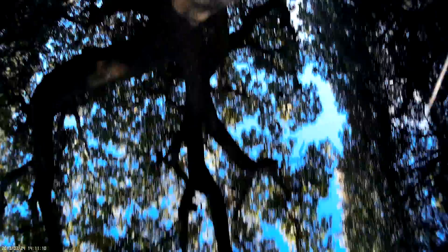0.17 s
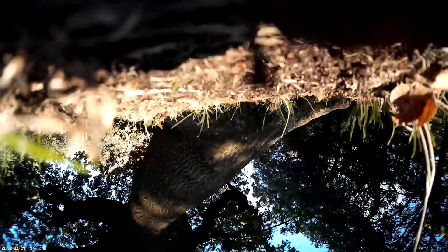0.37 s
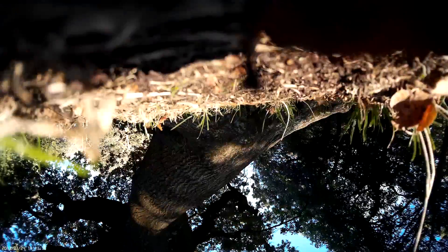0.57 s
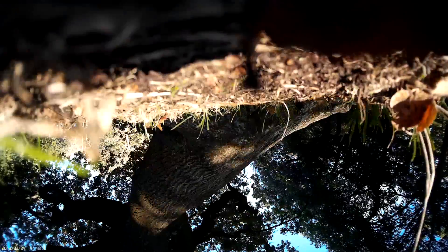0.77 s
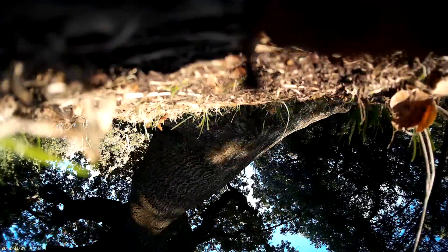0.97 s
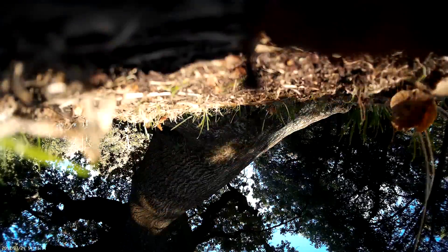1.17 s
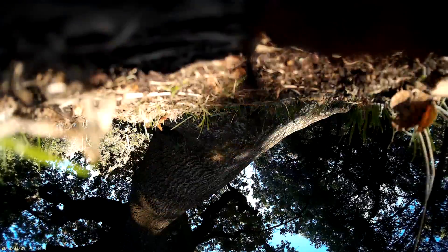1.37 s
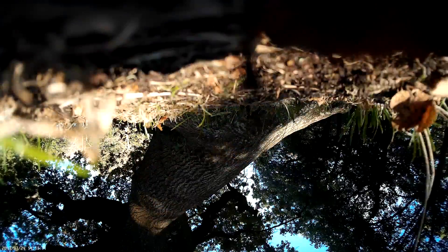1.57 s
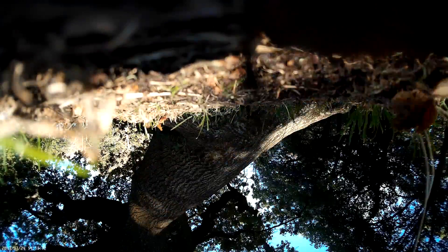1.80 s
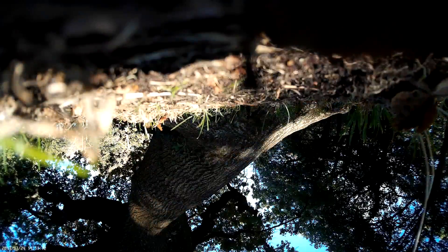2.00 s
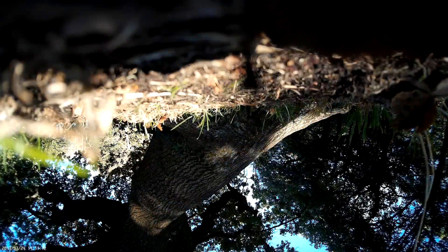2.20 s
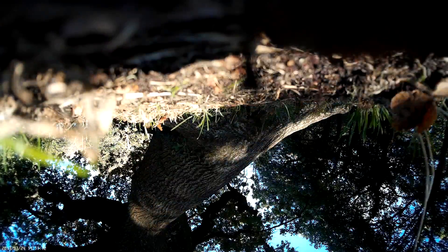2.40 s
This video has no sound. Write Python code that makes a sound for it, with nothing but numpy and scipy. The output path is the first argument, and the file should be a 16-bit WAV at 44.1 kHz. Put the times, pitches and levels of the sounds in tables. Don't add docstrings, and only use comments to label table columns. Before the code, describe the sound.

A small drone crashes into dry leaf litter with a hard clattering rattle, then quiet outdoors

```python
import sys
import numpy as np
from scipy import signal
from scipy.fft import rfft, irfft, next_fast_len
from scipy.io import wavfile
from scipy.ndimage import uniform_filter1d, map_coordinates

SR = 44100
rng = np.random.default_rng(int(sys.argv[2]) if len(sys.argv) > 2 else 0)


def file_out(sig):
    cols = np.atleast_2d(sig).T
    lim = np.clip(cols, -1, 1)
    pcm = np.round(lim * 32767).astype(np.int16)
    wavfile.write(sys.argv[1], SR, pcm)


def makeup_ratio(level_db):
    decades = np.asarray(level_db, float) / 20
    return 10 ** decades


N = 108045

# (frequency [Hz], level [dB])
AIR_SPECTRUM = [(120, -23.5), (200, -4), (293, -3.5), (577, -7), (643, -7.5), (1260, -6), (2390, -9.5),
                (4970, -25), (15700, -40.5)]
# (frequency [Hz], level [dB])
RUMBLE_SPECTRUM = [(12, -29.5), (20, 8), (118, 1.5), (214, -5), (247, -15.5), (300, -13), (390, -36.5),
                   (660, -120)]
# (time [s],
# peak level [dB], ring frequency [Hz])
SHARP_TICKS = [(.001, -30.5, 6000), (.022, -36, 5930), (0.0398, -27, 10200), (.042, -29, 9030),
               (0.0725, -19, 5920), (0.0813, -19, 9700), (0.086, -31, 10000), (0.1081, -22, 9400),
               (.125, -35, 9000), (0.1385, -29, 4470), (0.15, -27, 8000), (0.1556, -19, 7500),
               (.161, -25, 6940), (.166, -17.5, 5700), (.1695, -20, 5500), (0.1733, -21, 6000),
               (0.1797, -19, 7600), (0.1798, -23.5, 2020), (0.192, -24.5, 1670), (0.1934, -17.5, 3780),
               (.1934, -22, 11000), (0.211, -31.5, 7040), (.432, -32, 7000), (0.464, -45, 8500),
               (.472, -41, 3500), (.4767, -25.5, 2800), (0.4825, -27.5, 2040), (.4845, -32, 2520),
               (0.4887, -27, 2900), (0.522, -48, 9000), (.552, -51, 7460), (0.0729, -24.5, 11000),
               (.1914, -21.5, 1900), (0.1543, -25.5, 5000), (.2045, -31, 9000), (.3885, -37, 7500),
               (0.303, -17, 5230), (0.3194, -12, 14420), (.3764, -21, 13900), (0.4023, -24, 6500),
               (.4058, -27, 4860), (.3642, -32, 10500), (0.3102, -27, 7200)]
# (time [s], level [dB])
SLIDE_LEVEL = [(0, -59.5), (.14, -45.5), (.16, -44), (.208, -43.5), (.22, -32), (.262, -28.5),
               (.288, -37.5), (.33, -25.5), (.365, -36), (.39, -40), (.435, -51), (.6, -66)]
# (frequency [Hz], level [dB])
LITTER_SPECTRUM = [(120, -36.5), (200, 1.5), (547, 2), (1760, 3), (1900, 6.5), (2400, -13), (2890, -3.5),
                   (5370, -3.5), (11000, -13), (15900, -21.5)]
# (frequency [Hz], level [dB])
CRACK_SPECTRUM = [(400, -26.5), (900, -6), (1700, -3), (3200, 3), (7300, -1), (12000, -9), (15000, -23.5),
                  (16600, -27.5)]
# (time [s], blade rate [Hz], hiss level [dB], blade tone level [dB], overtone level [dB])
FRONT_PASS = [(0, 475, -59.5, -76.5, -78.5), (.9, 468.7, -58.5, -75, -73.5),
              (1.25, 478.5, -53, -59.5, -62.5), (1.45, 485.4, -51.5, -57, -59),
              (1.62, 497.3, -50, -57.5, -61), (1.68, 505.2, -45.5, -56, -55.5),
              (1.76, 507.8, -46.5, -51, -53), (1.82, 502.4, -44.5, -50, -54),
              (1.88, 500.9, -45.5, -65, -45.5), (1.94, 510, -43, -55.5, -45.5),
              (2.0, 485.2, -45, -53.5, -51.5), (2.07, 466.4, -45, -51.5, -51.5),
              (2.125, 446.2, -45.5, -49, -48), (2.17, 444, -49, -61.5, -60), (2.22, 441.6, -55, -62, -69),
              (2.32, 442, -53.5, -58, -61), (2.45, 450, -52, -55, -65.5)]
# (time [s], blade rate [Hz], level [dB])
REAR_PASS = [(.9, 395, -71.5), (1.4, 406.2, -62.5), (1.65, 413.5, -57.5), (1.77, 419.5, -54),
             (1.86, 418.3, -45.5), (1.9, 415.5, -53), (1.96, 406.8, -52), (2.07, 368.1, -55),
             (2.22, 349.7, -56.5), (2.33, 368.6, -56.5), (2.45, 373, -57)]
# (time [s], blade rate [Hz], level [dB])
TURNING_AWAY = [
    (1.95, 430, -83),
    (2.12, 432.2, -64),
    (2.3, 423.4, -57),
    (2.45, 404.4, -53.5),
]
# (multiple of blade rate [1], level [dB])
BLADE_PARTIALS = [(.5, -11), (1, 0)]
# (multiple of blade rate [1], level [dB])
FRONT_OVERTONES = [(2, -3), (3, 0), (4, -7.5), (5, -13.5), (7, -12), (8, -14)]
# (multiple of blade rate [1], level [dB])
REAR_PARTIALS = [(.5, -8), (1, -1.5), (2, -8), (3, -5), (4, -14), (5, -12)]
# (multiple of blade rate [1], level [dB])
TURNING_PARTIALS = [(.5, -2.5), (1, -2), (1.5, -7.5), (3, -14.5)]
# (frequency [Hz], level [dB])
ROTOR_SPECTRUM = [(170, -46), (280, -8), (1600, -3.5), (2300, -9), (4000, -13), (7600, -18.5), (8600, -25),
                  (15700, -33)]
# (time [s], peak level [dB], frequency [Hz])
SOIL_THUDS = [(0.039, -42, 149), (0.221, -25, 64.4), (.249, -17, 791), (0.246, -19.5, 201),
              (0.2535, -14, 342), (.2535, -6, 695), (0.256, -13.5, 130), (0.2587, -12.5, 259.6),
              (.259, -17, 420), (.274, -17.5, 536), (0.306, -24, 344), (0.318, -16, 131),
              (.321, -17.5, 670), (0.331, -20, 790), (0.338, -27, 70), (0.354, -27, 70),
              (0.353, -23.5, 560)]
# (frequency [Hz], level [dB])
LEAK_TONES = [(14826, -78), (15499, -82)]
# (time [s], length [s], level [dB])
LEAK_BURSTS = [
    (.066, .175, 0),
    (1.074, 0.16, 2),
    (2.065, .09, 4),
]
# (time of peak [s], peak level [dB], ring frequency [Hz], contact time [s])
FRAME_BLOWS = [(.2172, -27, 1990, .0007), (.223, -24.5, 5600, 0.0027), (.232, -25, 1900, 0.0006),
               (.2372, -20, 4910, 0.0013), (.2452, -22, 10060, 0.00033), (.2468, -13.5, 1954, .001),
               (.2488, -10, 1925, 0.0014), (.2508, -3.5, 7180, .0006), (.2510, -5, 4855, .0007),
               (.2509, -11.5, 9530, .0005), (.2508, -11.5, 13800, 0.00058), (.2536, -17, 11980, 0.00067),
               (.2538, -11.5, 14170, 0.00042), (.2552, -0.5, 1612, .0011), (.2566, -2.5, 6160, .0007),
               (.2566, -7, 9940, 0.00087), (.2568, -10, 11570, .0006), (.2592, -8, 1650, 0.0011),
               (.2729, -5, 7380, .0005), (.2729, -15, 13700, 0.00038), (.2767, -15, 7400, 0.00069),
               (.2766, -20.5, 12500, .0005), (.2942, -27, 1210, .001), (.2965, -32, 2700, 0.0011),
               (.3023, -15, 1700, 0.0005), (.3127, -20, 10900, .0007), (.3136, -15, 7480, 0.00098),
               (.3158, -18, 3830, 0.0007), (.319, -14, 8860, .0004), (.3196, 0.5, 3200, 0.0008),
               (.3275, -20.5, 1800, .0015), (.3352, -21, 1000, 0.00094), (.336, -20, 3600, .001),
               (.3383, -12.5, 7350, 0.00045), (.3384, -15, 12000, 0.00044), (.3482, -29.5, 12500, 0.0005),
               (.351, -23.5, 5000, 0.00081), (.355, -16, 3200, .0006), (.3567, -23, 7400, 0.00062),
               (.3598, -18, 4000, 0.00071), (.369, -27.5, 1710, .0012), (.3738, -16, 2880, 0.0008),
               (.3762, -19.5, 2850, .001), (.3763, -21.5, 5900, .0007), (.3785, -20.5, 1710, .0015),
               (.4021, -26, 4930, 0.00084), (.4148, -21.5, 4900, 0.001), (.4174, -29, 4800, .0006),
               (.4194, -16, 4610, 0.001), (.4214, -23, 4720, 0.00077)]
# (frequency [Hz], level [dB], T60 [s])
FRAME_MODES = [(1650, -8.5, 0.019), (1954, -12, .025), (3200, -20, .015), (4900, -9, 0.022),
               (7400, -12.5, 0.023), (12000, -16.5, .015)]
# (frequency [Hz], width [Hz], level [dB])
CASE_RESONANCES = [(2594, 500, -8.5), (3910, 280, 4), (4970, 160, 5), (6740, 580, 0.5)]


def unit(x):
    return x / np.sqrt(np.mean(x ** 2) + 1e-20)


def curves(rows):
    times, *columns = np.transpose(rows)
    return [np.interp(np.arange(N) / SR, times, column) for column in columns]


def wobble(rate):
    knots = rng.standard_normal(int(N * rate / SR) + 4)
    return map_coordinates(knots, [np.arange(N) * rate / SR])


def coloured(x, points):
    size = next_fast_len(N + 8192)
    hz, db = np.transpose(points)
    bins = np.fft.rfftfreq(size, 1 / SR)
    gain = makeup_ratio(np.interp(np.log(bins + 1), np.log(hz + 1), db))
    return irfft(rfft(x, size) * gain, size)[:N]


def rush(points, patchy_db):
    z = signal.stft(rng.standard_normal(N + 512), nperseg=512)[2]
    field = uniform_filter1d(rng.standard_normal(z.shape), 5, 0)
    field = unit(uniform_filter1d(field, 10, 1))
    patchy = signal.istft(z * makeup_ratio(patchy_db * field), nperseg=512)[1][:N]
    return unit(coloured(patchy, points))


def outdoors():
    air_db = -51.5 + 0.79 * wobble(8)
    air = makeup_ratio(air_db) * rush(AIR_SPECTRUM, patchy_db=0.5)
    gust_s, gust_length_s, gust_db = 1.81, 0.094, 4.5
    t = np.arange(N) / SR
    gust = gust_db * np.exp(-((t - gust_s) / gust_length_s) ** 2)
    rumble_db = -52.5 + gust + 1.4 * wobble(10)
    return air + makeup_ratio(rumble_db) * rush(RUMBLE_SPECTRUM, patchy_db=1.5)


def swell(u):
    return (u * np.exp(1 - u)) ** 1.11


def contacts(rows, ring_db, crack_db, crack_share):
    spread, snap_size, snap_s = 0.12, 0.3, 0.00016
    mode_rank = np.arange(4)[:, None]
    mode_gain = np.array([[1], [.25], [.15], [.12]])
    out = np.zeros(N + SR)
    t = np.arange(SR // 20) / SR
    grit = unit(coloured(rng.standard_normal(N), CRACK_SPECTRUM))
    snap = snap_size * swell(t / snap_s)
    for s, db, hz, length in rows:
        start = max(round((s - length) * SR), 0)
        detune, phase = rng.uniform(-0.88, 1, (2, 4, 1))
        mode_hz = hz * (1 + spread * detune * mode_rank)
        ring = (np.sin(2 * np.pi * mode_hz * t + np.pi * phase) * mode_gain).sum(0)
        crack_swell = swell(t / (crack_share * length)) + snap
        crack = makeup_ratio(crack_db) * crack_swell * grit[start:start + len(t)]
        hit = makeup_ratio(ring_db) * swell(t / length) * ring + crack
        out[start:start + len(t)] += makeup_ratio(db) * hit
    return out[:N]


def sharp_ticks():
    t60_s = .0014
    rows = []
    for s, db, hz in SHARP_TICKS:
        rows.append((s, db, hz, t60_s / np.log(1000) * (6000 / hz) ** 1.3))
    return contacts(rows, ring_db=-6.5, crack_db=-13.0, crack_share=1.7)


def litter_slide():
    level_db, = curves(SLIDE_LEVEL + [(.75, -105)])
    grain_db = 2.796 * wobble(1600) + 1.8 * wobble(350)
    return makeup_ratio(level_db) * unit(rush(LITTER_SPECTRUM, patchy_db=3.0) * makeup_ratio(grain_db))


def turns(hz, jitter):
    return 2 * np.pi * np.cumsum(hz * (1 + jitter * wobble(30))) / SR


def propellers(phase, orders, flutter_db):
    out = np.zeros(N)
    for multiple, db in orders:
        level = np.sqrt(2) * makeup_ratio(db + flutter_db * wobble(18))
        out += level * np.sin(multiple * phase + rng.uniform(0, 2 * np.pi))
    return out


def passing_drone():
    hz, hiss_db, blade_db, over_db = curves(FRONT_PASS)
    hiss = rush(ROTOR_SPECTRUM, patchy_db=.8) * makeup_ratio(wobble(400) + .7 * wobble(15))
    phase = turns(hz, jitter=.004)
    front = makeup_ratio(hiss_db) * hiss
    front += makeup_ratio(blade_db) * propellers(phase, BLADE_PARTIALS, flutter_db=1.6)
    front += makeup_ratio(over_db) * propellers(phase, FRONT_OVERTONES, flutter_db=2.5)
    hz, level_db = curves(REAR_PASS)
    rear = makeup_ratio(level_db) * propellers(turns(hz, jitter=0.0048), REAR_PARTIALS, flutter_db=1.5)
    hz, level_db = curves(TURNING_AWAY)
    third = makeup_ratio(level_db) * propellers(turns(hz, jitter=0.0049), TURNING_PARTIALS, flutter_db=3.0)
    return front + rear + third


def soil_thuds():
    rise_s = 0.00037
    out = np.zeros(N)
    t = np.arange(SR // 10) / SR
    for s, db, hz in SOIL_THUDS:
        push = np.exp(-(170 + 0.42 * hz) * t) * (1 - np.exp(-t / rise_s))
        out[round(s * SR):][:len(t)] += makeup_ratio(db) * np.sin(2 * np.pi * hz * t) * push
    return out


def electronic_leak():
    t = np.arange(N) / SR
    gate = sum(makeup_ratio(db) * ((t > s) & (t < s + length)) for s, length, db in LEAK_BURSTS)
    tones = sum(np.sqrt(2) * makeup_ratio(db) * np.sin(2 * np.pi * hz * t) for hz, db in LEAK_TONES)
    return uniform_filter1d(gate, size=90) * tones


def frame_ringing(x):
    t = np.arange(SR // 20) / SR
    modes = np.zeros(len(t))
    for hz, db, t60 in FRAME_MODES:
        modes += makeup_ratio(db - 60 * t / t60) * np.sin(2 * np.pi * hz * t) * 14 / (t60 * SR)
    return x + signal.fftconvolve(x, modes)[:N]


def frame_blows():
    return frame_ringing(contacts(FRAME_BLOWS, ring_db=-4.5, crack_db=-11.5, crack_share=0.73))


def scene():
    case_top_hz, frame_top_hz, slope_hz = 15780, 16150, 600
    size = next_fast_len(N + 8192)
    f = np.fft.rfftfreq(size, 1 / SR)
    case_db = sum(db * np.exp(-((f - hz) / width) ** 2) for hz, width, db in CASE_RESONANCES)
    case = makeup_ratio(case_db) * (f < case_top_hz)
    frame = np.clip((frame_top_hz - f) / slope_hz, 0, 1)
    distant = outdoors() + passing_drone()
    crash = sharp_ticks() + litter_slide() + soil_thuds() + frame_blows()
    far = irfft(rfft(distant, size) * case, size)[:N]
    near = irfft(rfft(crash, size) * frame, size)[:N]
    return (near + far + electronic_leak())[None]


def band_limit(x):
    return signal.sosfilt(signal.butter(12, 16810, fs=SR, output="sos"), x)


def record(dry):
    clip, edge_hz, slope_hz, bass_hz = .7, 16750, 600, 28
    clipped = dry / (1 + np.abs(dry / clip) ** 6) ** (1 / 6)
    f = np.fft.rfftfreq(N, 1 / SR)
    treble_edge = np.clip((edge_hz - f) / slope_hz, 0, 1)
    bass_edge = 1j * f / (bass_hz + 1j * f)
    mix = irfft(rfft(clipped) * treble_edge * bass_edge, N)
    return band_limit(mix)


dry = scene()
out = record(dry)
file_out(out)
```